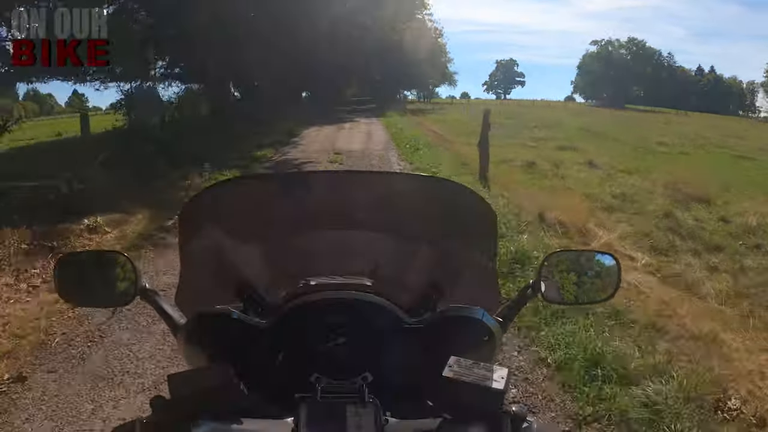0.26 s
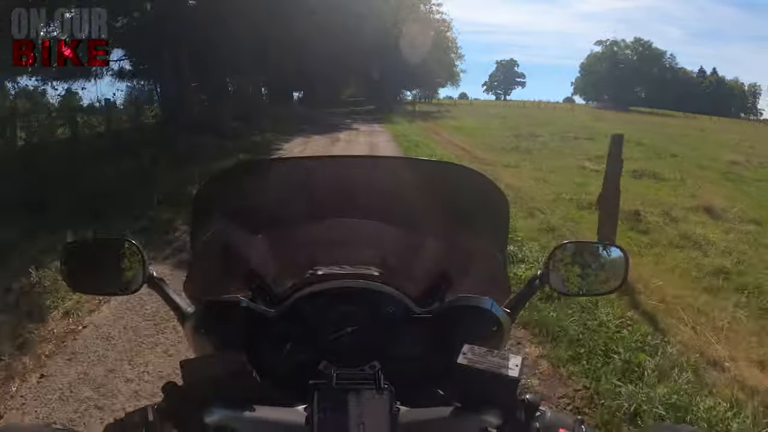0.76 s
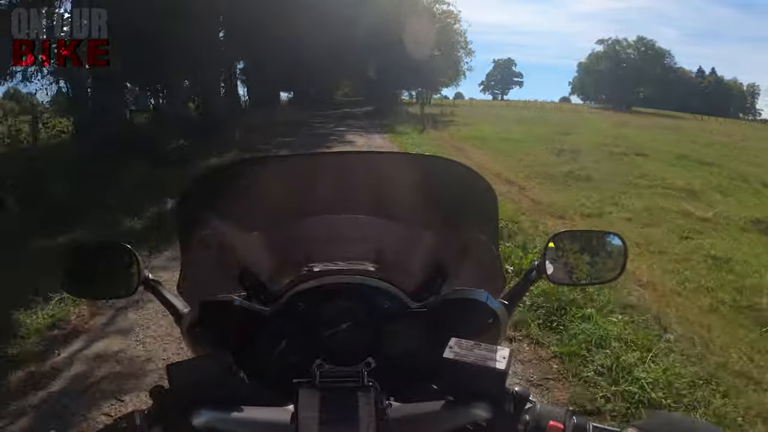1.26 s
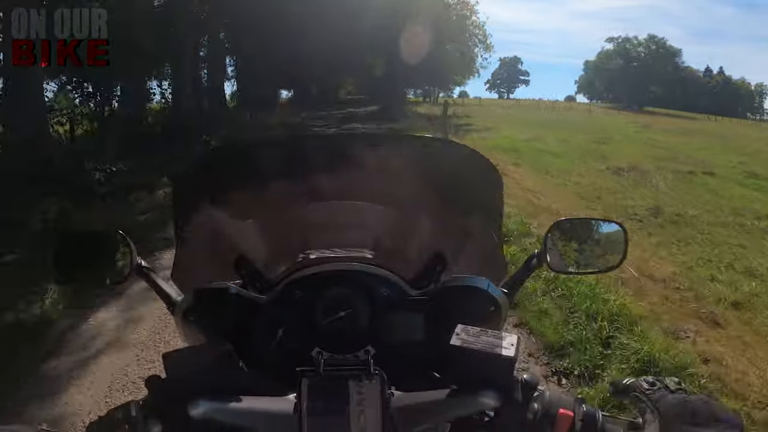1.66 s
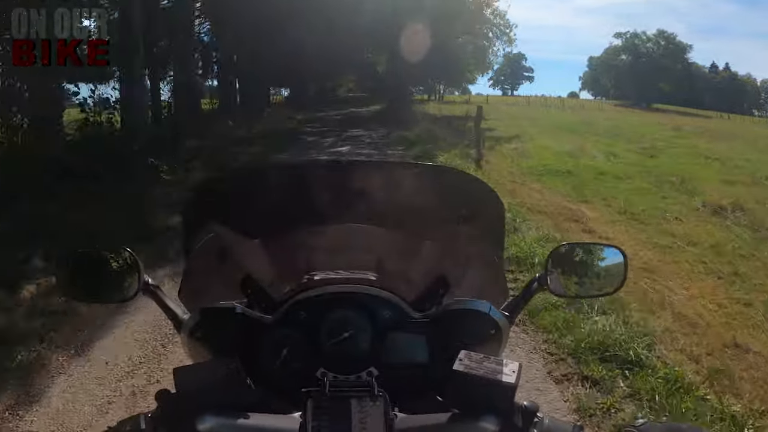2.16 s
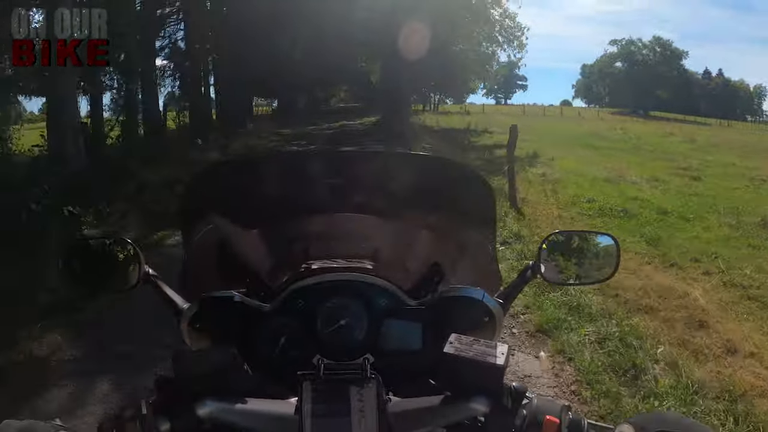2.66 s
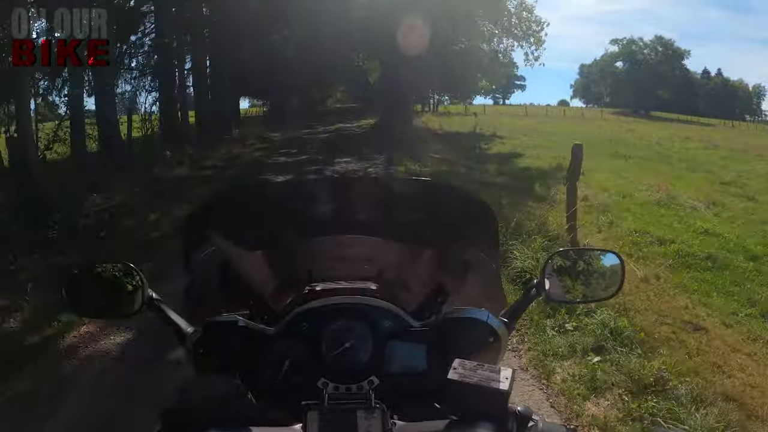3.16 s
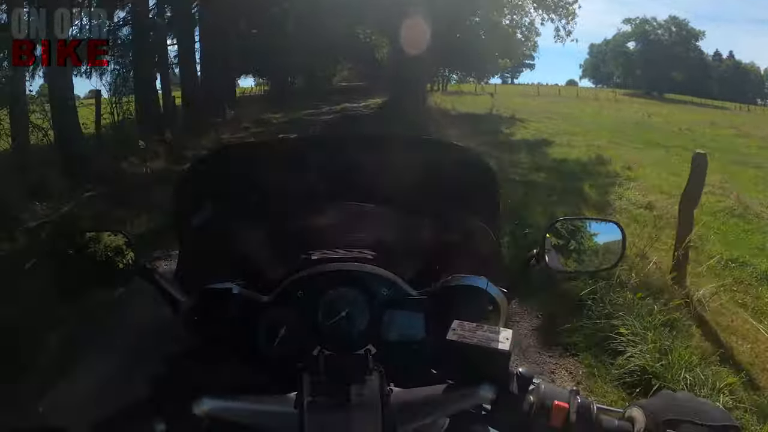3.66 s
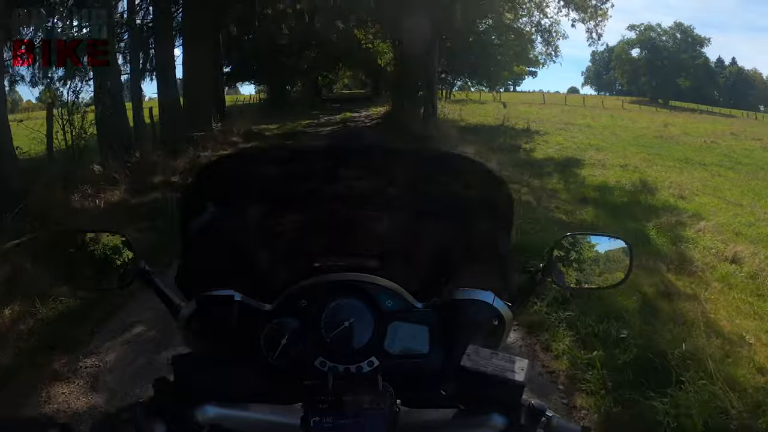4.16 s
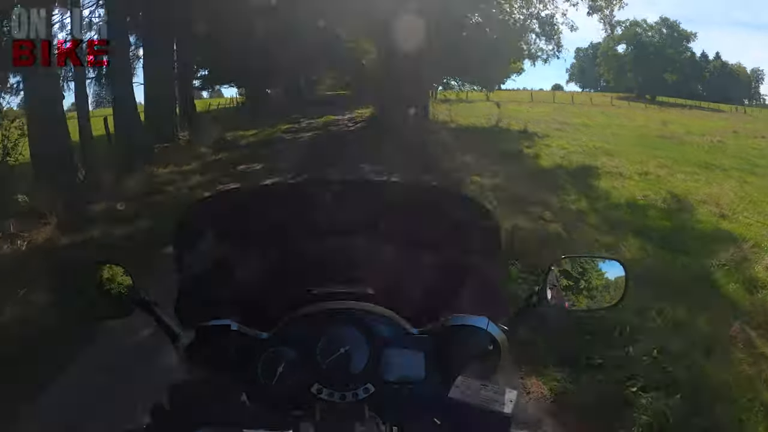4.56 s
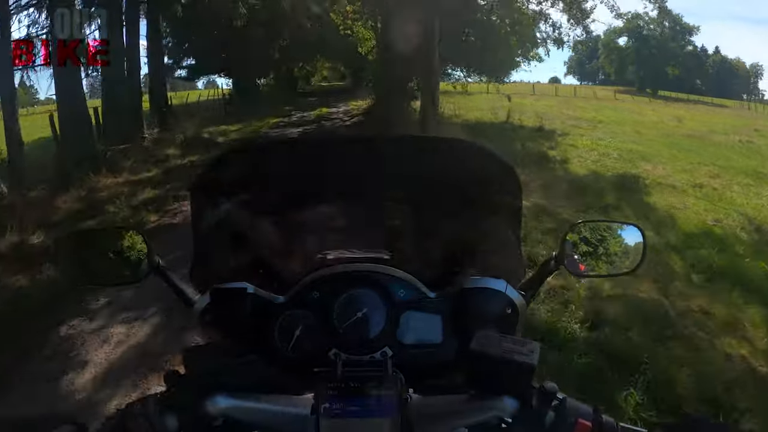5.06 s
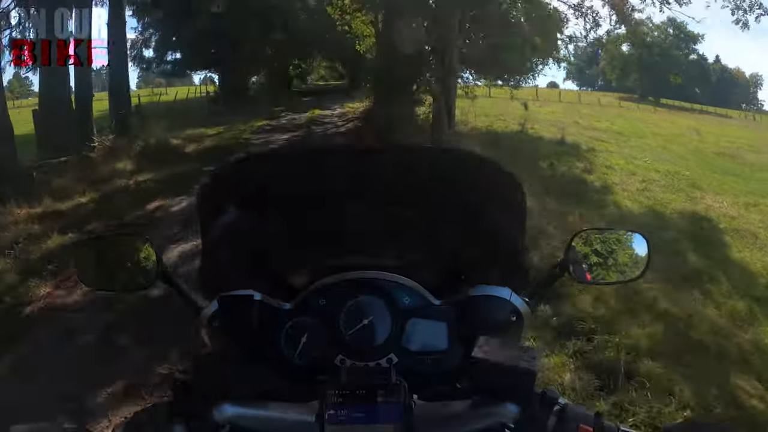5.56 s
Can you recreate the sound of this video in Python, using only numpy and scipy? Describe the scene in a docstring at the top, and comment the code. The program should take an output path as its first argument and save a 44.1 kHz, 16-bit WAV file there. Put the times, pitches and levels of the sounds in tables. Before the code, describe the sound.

A twin-cylinder motorcycle rides slowly along a gravel lane, heard from the rider's seat. The low exhaust throbs under mechanical clatter and a light gear whine. The revs climb after about a second, settle, then rise and dip in short throttle pushes. Wind buffets the microphone heavily at first and eases past halfway. The tyres roll and crunch softly over grit, and bumps bring small knocks from the bodywork.

```python
"""Motorcycle on a gravel lane, from the saddle.

A twin-cylinder tourer at low speed, microphone at the rider's seat, behind the windscreen.
Close below, the exhaust throbs, the valve gear clatters and a gear whines as the throttle opens and
shuts. Wind buffets the microphone, the tyres crunch over grit, and bumps rattle the bodywork."""
import sys
import numpy as np
from scipy import signal
from scipy.fft import rfft, irfft, next_fast_len
from scipy.io import wavfile

SR = 44100
rng = np.random.default_rng(int(sys.argv[2]) if len(sys.argv) > 2 else 0)


def wav_record(signal):
    """Record a signal, one row per channel, as 16-bit PCM in the file named by sys.argv[1]."""
    frames = np.transpose(np.atleast_2d(signal))
    bounded = np.clip(frames, -1, 1)
    # unit amplitude maps onto the largest positive 16-bit level
    quanta = np.round(bounded * 32767).astype(np.int16)
    wavfile.write(sys.argv[1], SR, quanta)


N = 256220
T = np.arange(N) / SR
CRUISE_HZ, CRUISE_DB = 38, -21  # engine cycle rate and firing level when cruising


def amp(db):
    """Decibels to gain."""
    return 10 ** (np.asarray(db) / 20)


def unit(x):
    """Scales to rms 1."""
    return x / np.sqrt(np.mean(x ** 2) + 1e-20)


def played(rows):
    """The columns of a time table, interpolated at every sample."""
    times, *columns = np.transpose(rows)
    return [np.interp(T, times, column) for column in columns]


def gain_at(spectrum, hz):
    """Reads a spectrum's gain on a log-frequency axis."""
    f, db = np.transpose(spectrum)
    return amp(np.interp(np.log(hz + 1), np.log(f + 1), db))


def coloured(x, spectrum):
    """Filters x by a spectrum, to rms 1."""
    size = next_fast_len(len(x))
    gain = gain_at(spectrum, np.fft.rfftfreq(size, 1 / SR))
    return unit(irfft(rfft(x, size) * gain, size)[:len(x)])


def wander(hz):
    """Random drift of rms 1, at rates up to about hz."""
    size = next_fast_len(N)
    lowpass = np.exp(-(np.fft.rfftfreq(size, 1 / SR) / hz) ** 2)
    return unit(irfft(rfft(rng.standard_normal(size)) * lowpass, size)[:N])


def add(mix, start_s, sound):
    """Mixes a sound in at start_s."""
    part = mix[max(round(start_s * SR), 0):][:len(sound)]
    part += sound[:len(part)]


def rattle(length_s, hz, octaves):
    """A short burst of noise ringing around one pitch, quick to rise and slower to die."""
    t, f = np.arange(8192) / SR, np.fft.rfftfreq(8192, 1 / SR)
    band = np.exp(-.5 * (np.log2((f + 1) / hz) / octaves) ** 2)
    ring = unit(irfft(rfft(rng.standard_normal(len(t))) * band))
    age = 4 * t / length_s  # loudest at a quarter of the length
    return ring * age * np.exp(1 - age)


def singing(wind_db, hz=5621, drift_hz=6, level_db=-74, wind_follows=.33):
    """Far back in the mix, a thin high tone that wavers slightly and is stronger in the wind."""
    db = level_db + wind_follows * (wind_db - wind_db.mean())
    flicker = 1 + .25 * wander(25)
    phase = 2 * np.pi * np.cumsum(hz + drift_hz * wander(18)) / SR
    return np.sqrt(2) * amp(db) * flicker * np.sin(phase)


# Knocks on the panels around the seat: t/s, level/dB, length/s, f/Hz, spread/octaves
PANEL_KNOCKS = [(0.659, -42, 0.042, 1570, 0.23), (0.832, -54, .015, 4400, .08),
                (1.064, -49, 0.11, 1780, 0.35), (1.841, -37.5, 0.021, 1010, .27),
                (2.165, -48.5, 0.027, 2180, 0.62), (2.473, -48, 0.011, 1500, 0.6),
                (3.104, -51, 0.029, 4540, 0.011), (3.11, -61, 0.04, 12000, .09),
                (4.105, -58, 0.062, 3280, .06), (4.249, -40, 0.016, 890, 0.34),
                (4.428, -44.5, .025, 1690, .25), (4.557, -48, 0.019, 1900, 1.3),
                (4.611, -49, 0.081, 1580, 0.1), (4.676, -56, 0.023, 3000, 1.1),
                (5.41, -52, 0.014, 2200, 1.2), (5.621, -51, 0.02, 4000, 0.71),
                (5.75, -50.5, 0.024, 2500, 1.1)]
def knocks():
    """Stones and bumps knock and ring the bodywork."""
    out = np.zeros(N)
    for start, db, length, hz, octaves in PANEL_KNOCKS:
        add(out, start, amp(db) * rattle(length, hz, octaves))
    return out


# Grit thrown up below the seat: t/s, level/dB, length/s
GRIT_SPRAYS = [(3.084, -44.5, 0.096), (4.087, -46, 0.094)]
# Spectrum of the flying grit: f/Hz, relative level/dB
SPRAY_SPECTRUM = [(500, 9.5), (1500, 1), (2900, -1), (3700, -3), (5000, -4), (6200, -11), (8000, -3.5),
                  (10000, -10.5), (12000, -12), (14000, -16), (16000, -26)]
def sprays():
    """The tyre flings grit in brief swells of hiss."""
    out = np.zeros(N)
    for start, db, length in GRIT_SPRAYS:
        swell = np.hanning(int(length * SR))
        hiss = coloured(rng.standard_normal(SR), SPRAY_SPECTRUM)[:len(swell)]
        add(out, start, amp(db) * swell * hiss)
    return out


# Stretches of washboard along the lane: t/s, length/s, chink level/dB
WASHBOARD_STRETCHES = [(0.0, .17, -56), (.4, .14, -61), (.72, .45, -57.5), (1.184, .37, -56),
                       (1.677, .15, -60)]
def chinks(hz=7820, pitch_scatter=.01, per_s=36, scatter_db=2.5, scrape_db=-3.5):
    """Washboard shakes loose metal; each touch is a narrow ring with a gritty scrape."""
    out = np.zeros(N)
    for start, length, db in WASHBOARD_STRETCHES:
        for slot in np.arange(start, start + length, 1 / per_s):
            onset = slot + rng.random() / per_s
            strength, detune = rng.standard_normal(2)
            ring = rattle(length_s=.0063, hz=hz * (1 + pitch_scatter * detune), octaves=.018)
            scrape = amp(scrape_db) * rattle(length_s=.027, hz=8500, octaves=.58)
            add(out, onset, amp(db + scatter_db * strength) * (ring + scrape))
    return out


# Tyre roar, heard from the seat: f/Hz, relative level/dB
ROAR_SPECTRUM = [(100, 2.5), (220, 1), (340, 1), (430, 2), (540, 1.5), (605, 2), (700, -7), (790, -5),
                 (880, 4.5), (1050, -8), (1400, -11.5), (2200, -27.5), (5000, -45.5)]
# Gravel under the tread: f/Hz, relative level/dB
CRUNCH_SPECTRUM = [(1200, -13), (2500, 1.5), (3400, 3), (4000, -1), (5000, -0.5), (6000, 1), (8000, 0),
                   (9000, -3.5), (11000, -8), (13500, -10), (15500, -37)]
def tyres(roar_db, road_db, crunch_db=-59, road_follows=.27, stones_per_s=900, snap_s=.0011):
    """A patchy rolling roar, with grit snapping under the tread in small clumps."""
    hits = rng.random(N) < stones_per_s / SR
    stones = hits * amp(2 * np.minimum(rng.exponential(1, N), 4))
    snaps = signal.lfilter([1], [1, -np.exp(-1 / (snap_s * SR))], stones) * rng.standard_normal(N)
    crunch = coloured(.3 * unit(snaps) + .7 * rng.standard_normal(N), CRUNCH_SPECTRUM)
    roar = coloured(rng.standard_normal(N), ROAR_SPECTRUM)
    patches_db, clumps_db = 1.64 * wander(22), 1.55 * wander(60)
    return amp(roar_db + patches_db) * roar + amp(crunch_db + road_follows * road_db + clumps_db) * crunch


# Eddies right on the microphone: f/Hz, relative level/dB
EDDY_SPECTRUM = [(5, -14.5), (16, -4), (23, -0.5), (28, -4), (38, -4), (50, -13), (65, -14), (110, -25),
                 (160, -23.5), (200, -33), (240, -38), (400, -48.5), (1000, -90)]
def wind(level_db, gust_db=2.4, dull_hz=170):
    """Lumpy eddies behind the windscreen strike the microphone, one about as strong as the next."""
    eddies = np.tanh(.31 * coloured(rng.standard_normal(N), EDDY_SPECTRUM))
    rumble = unit(signal.sosfilt(signal.butter(2, dull_hz, fs=SR, output="sos"), eddies))
    return amp(level_db + gust_db * wander(27)) * rumble


def intake(cycles, load_db, level_db=-54, load_follows=.26, airbox_hz=605, width_hz=60):
    """Each gulp of air rings the airbox: a growl that grows with the throttle."""
    gulps = (1 + np.cos(2 * np.pi * cycles)) * rng.standard_normal(N)
    airbox = signal.iirpeak(airbox_hz, airbox_hz / width_hz, SR)
    growl = unit(signal.lfilter(*airbox, signal.lfilter(*airbox, gulps)))
    return amp(level_db + load_follows * load_db) * growl


def clatter_level(speed, load_db, road_db, cruising_db=-47, load_follows=.27, road_follows=.29):
    """The engine clatters more when racing, when labouring at low revs, under load and on rough ground."""
    octaves = np.log2(speed / CRUISE_HZ)
    racing_db, labouring_db = 2 * np.maximum(octaves, 0), 9.5 * np.maximum(-octaves, 0)
    return cruising_db + racing_db + labouring_db + load_follows * load_db + road_follows * road_db


# Ringing of the engine cases and covers: f/Hz, width/Hz, level/dB re the broad response
CASE_RESONANCES = [(406, 31, -9), (580, 61, 3), (876, 56, -1.5), (1550, 79, -4), (1687, 69, -3),
                   (1813, 39, -1), (2720, 130, -0.5), (4880, 300, -0.5)]
# Broad response of the cases, close below the microphone: f/Hz, relative level/dB
CASE_SPECTRUM = [(300, -6), (480, -22), (560, -19), (720, 4), (860, 4.5), (1000, 5.5), (1150, 1), (1350, 2),
                 (1650, -2), (1900, -4), (2250, -9.5), (2700, -14.5), (4000, -23), (5000, -18.5),
                 (8000, -28.5), (12000, -37), (15500, -54.5)]
def clatter(cycles, level_db, lead_cycles=.2, knock_cycles=.36, tap_cycles=.028, uneven_db=5):
    """The main firing and four valve closings a cycle shake the cases, ahead of the exhaust beat."""
    cycles = cycles + lead_cycles
    cycle, valve = cycles.astype(int), (4 * cycles).astype(int)
    cycle_age, valve_age = cycles % 1, 4 * cycles % 1 / 4
    strength = amp(uneven_db * np.minimum(rng.standard_normal((2048, 2)), 2))
    knock = .9 * strength[cycle, 0] * np.exp(-cycle_age / knock_cycles)
    taps = .23 * strength[valve, 1] * np.exp(-valve_age / tap_cycles)
    # the same parts meet in every cycle, so some of the noise repeats and sounds as engine overtones
    repeating = np.interp(cycle_age, np.linspace(0, 1, 1024), rng.standard_normal(1024))
    shake = (1 + knock + taps) * (.25 * unit(repeating) + rng.standard_normal(N))
    ringing = sum(amp(db) * signal.lfilter(*signal.iirpeak(hz, hz / width, SR), shake)
                  for hz, width, db in CASE_RESONANCES)
    return amp(level_db) * coloured(shake + ringing, CASE_SPECTRUM)


# How well the gear housing radiates toward the seat: f/Hz, relative level/dB
HOUSING_RESPONSE = [(780, -56), (870, -48), (915, -42), (975, -41), (1040, -43.5), (1130, -44.5),
                    (1240, -38.5), (1300, -39)]
def gear_whine(cycles, speed, firing_db, teeth_per_cycle=24, gain_db=-3, swing_rad=.62, flutter_rad=.4):
    """Meshing teeth; the crank speeds up and slows within each cycle, more so under load."""
    mesh_hz = teeth_per_cycle * speed
    slack = .014 * (CRUISE_HZ / speed) ** 2 * wander(7)  # drive slack bends the pitch, less at high revs
    angle, torque = 2 * np.pi * cycles, unit(amp(firing_db))
    phase = 2 * np.pi * np.cumsum(mesh_hz * (1 + slack)) / SR
    phase += swing_rad * torque * np.sin(angle) + flutter_rad * wander(40)
    throb = 1 + .29 * np.cos(angle)
    contact = unit(throb * (1 + .34 * wander(28)))
    tone = np.sin(phase) + amp(-21) * np.sin(2 * phase) + amp(-14) * wander(51) * np.sin(phase / 2)
    return np.sqrt(2) * amp(gain_db) * gain_at(HOUSING_RESPONSE, mesh_hz) * contact * tone


# What the silencer passes of the overtones: f/Hz, gain/dB
SILENCER_RESPONSE = [(90, 7.5), (122, -2.5), (138, -4.5), (152, -22.5), (168, -16), (200, -27.5),
                     (260, -32), (400, -43)]
# Gas puffing from the silencer, a short way from the seat: f/Hz, relative level/dB
PUFF_SPECTRUM = [(20, -4), (50, -11.5), (82, 8), (125, 2.5), (160, -7), (220, -34.5), (400, -54.5)]
def exhaust(cycles, speed, firing_db, load_db, lope_db=-27, even_db=-8, puff_db=-32.5):
    """Two unevenly spaced firings a cycle: a strong note, a lope an octave under it, muffled overtones."""
    angle = 2 * np.pi * cycles
    firing = amp(firing_db) * np.cos(2 * angle)
    lope = amp(lope_db + .94 * (firing_db - firing_db.mean())) * np.cos(angle + np.pi / 12)
    late = angle - np.pi / 16  # the silencer holds the overtones back a little
    overtones = np.zeros(N)
    for k in range(3, 9):
        pair_gain = amp(even_db) if k % 2 == 0 else 1  # the two firings partly cancel in even overtones
        overtones += pair_gain * gain_at(SILENCER_RESPONSE, k * speed) * np.cos(k * late)
    burn = 1 + .08 * wander(25)  # no two cycles burn alike
    gas = amp(puff_db) * coloured((1 + np.cos(angle)) * rng.standard_normal(N), PUFF_SPECTRUM)
    overtones *= amp(-31 + .87 * load_db) * (1 + .27 * wander(46))  # rough, and rising with the throttle
    return gas - np.sqrt(2) * burn * (lope + firing + overtones)


# Engine speed, in four-stroke cycles a second: t/s, f/Hz
ENGINE_SPEED = [(0, 37.82), (0.68, 39.52), (0.92, 44.38), (1.16, 53.29), (1.34, 52.27), (1.51, 44.82),
                (1.82, 38.43), (2.49, 38.17), (3.45, 37.75), (3.62, 46.35), (3.75, 41.65), (4.01, 39.47),
                (4.1, 42.9), (4.39, 36.72), (4.56, 30.78), (4.71, 33.14), (4.85, 41.89), (5.05, 39.42),
                (5.62, 35.52), (5.81, 30.87)]
# Throttle, as the strength of the firing note at the seat: t/s, level/dB
FIRING_LEVEL = [(0.0, -25.5), (0.7, -18.5), (1.1, -22), (1.4, -28), (1.7, -23.5), (2.0, -22.5), (3.4, -21),
                (4.2, -15), (4.58, -21), (4.87, -15), (5.3, -16), (5.81, -21)]
def engine(road_db):
    """Close below the rider, one crank drives exhaust, intake, clatter and whine."""
    speed, = played(ENGINE_SPEED)
    firing_db, = played(FIRING_LEVEL)
    load_db = firing_db - CRUISE_DB
    cycles = 3 / 4 + np.cumsum(speed) / SR
    return (exhaust(cycles, speed, firing_db, load_db) + intake(cycles, load_db)
            + clatter(cycles, clatter_level(speed, load_db, road_db))
            + gear_whine(cycles, speed, firing_db))


# The ride down the lane, at the microphone: t/s, wind level/dB, tyre roar level/dB
RIDE_LEVELS = [(0, -12.5, -33.5), (.5, -21.5, -37.5), (.78, -16, -36.5), (1.08, -18.5, -34.5),
               (1.32, -15, -38.5), (1.85, -18, -41.5), (2.65, -24, -47.5), (3.4, -23.5, -49),
               (3.75, -42, -45.5), (4.6, -31, -45), (5.35, -34, -43.5), (5.81, -26, -42)]
def scene():
    """Engine, wind, gravel and rattles meet at one microphone at the rider's seat."""
    wind_db, roar_db = played(RIDE_LEVELS)
    road_db = roar_db - roar_db.mean()  # how much rougher the ground is than on average
    mix = engine(road_db) + wind(wind_db) + tyres(roar_db, road_db) + singing(wind_db)
    return (mix + knocks() + sprays() + chinks())[None]


def record(dry):
    """Soft ends and a band limit in the top treble."""
    soft = dry * signal.windows.tukey(N, .002)
    lowpass = signal.firwin(511, cutoff=15600, window=("kaiser", 9), fs=SR)
    return signal.oaconvolve(soft, lowpass[None], "same")


dry = scene()
out = record(dry)
wav_record(out)
```